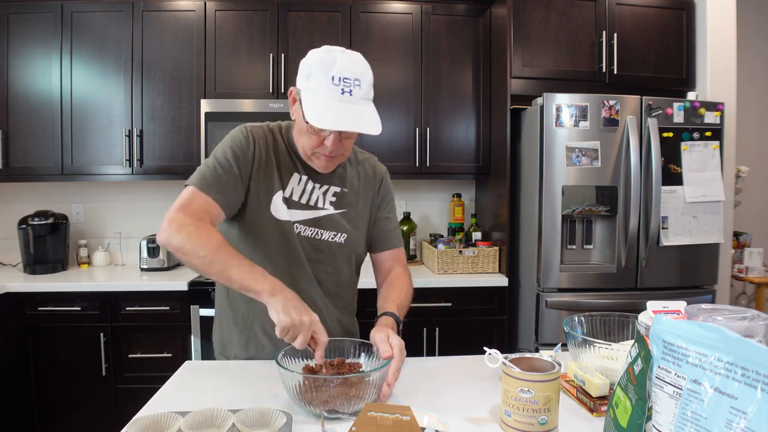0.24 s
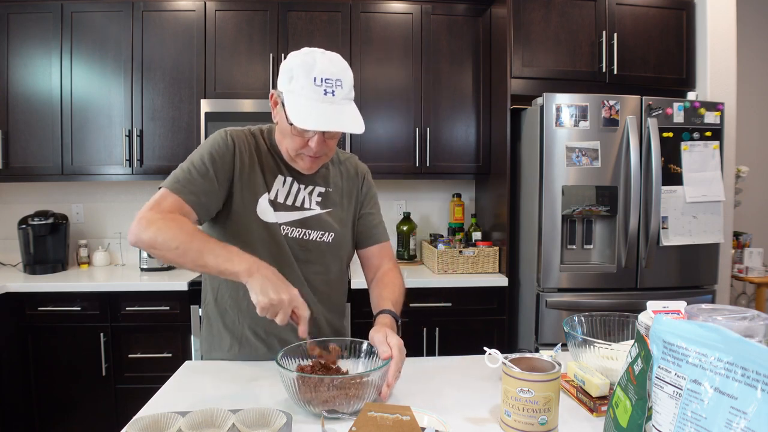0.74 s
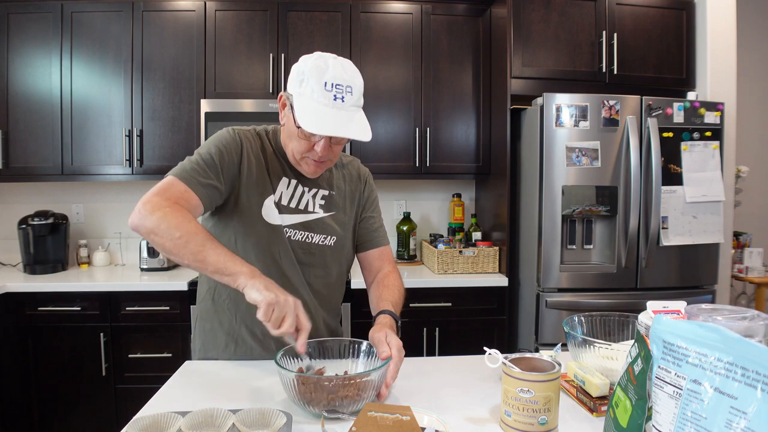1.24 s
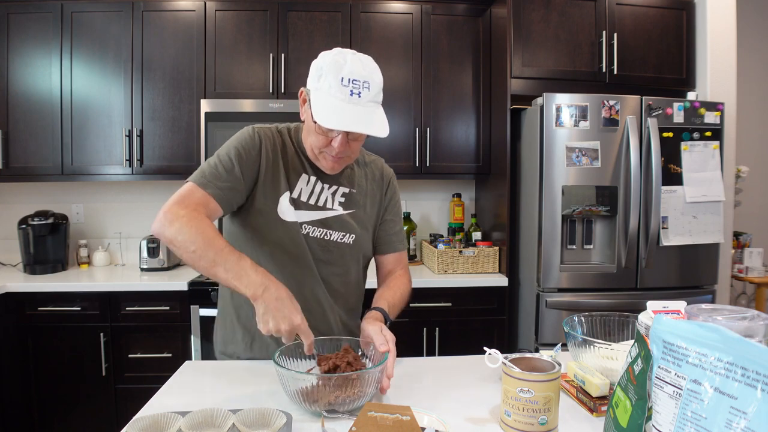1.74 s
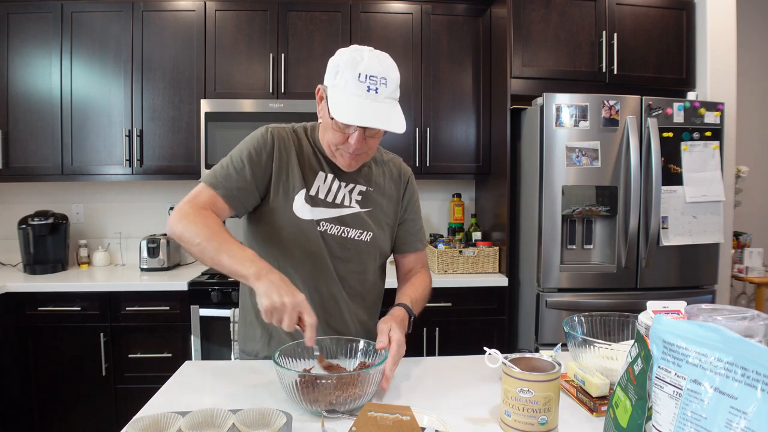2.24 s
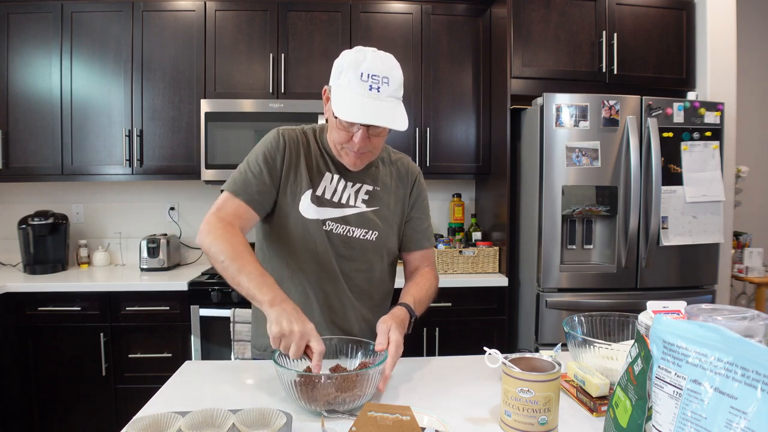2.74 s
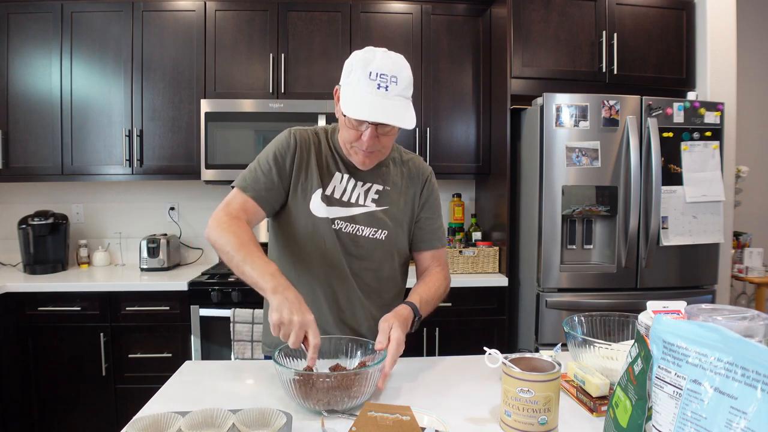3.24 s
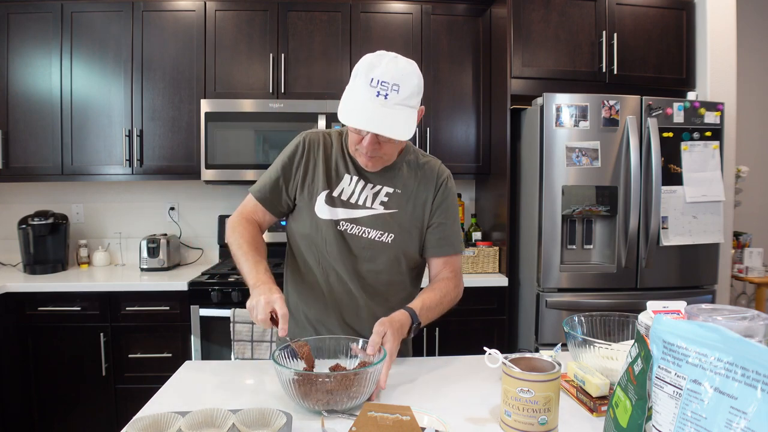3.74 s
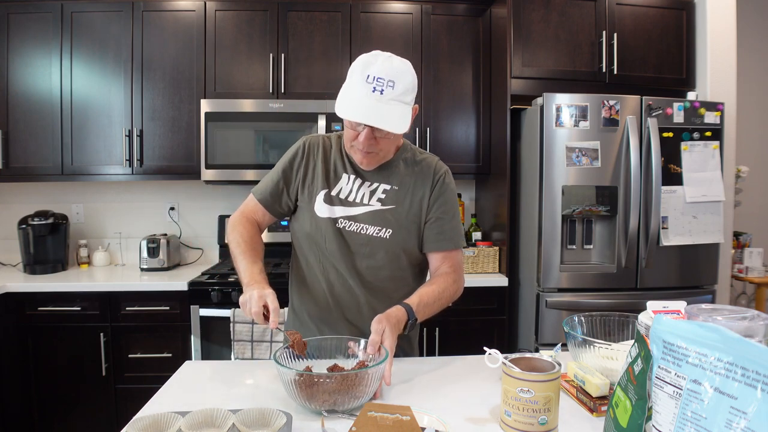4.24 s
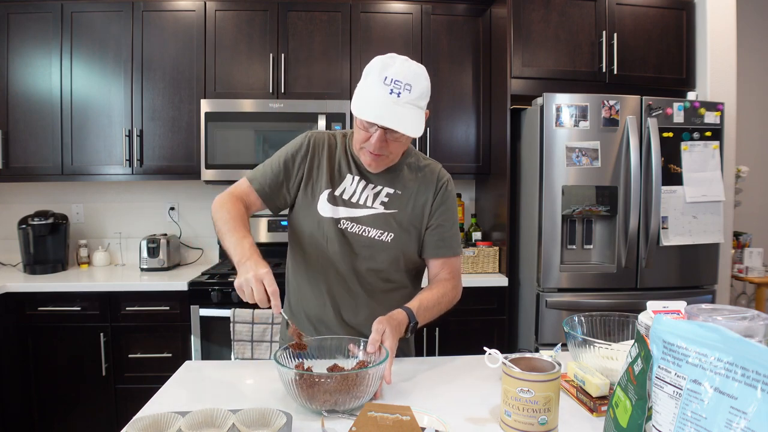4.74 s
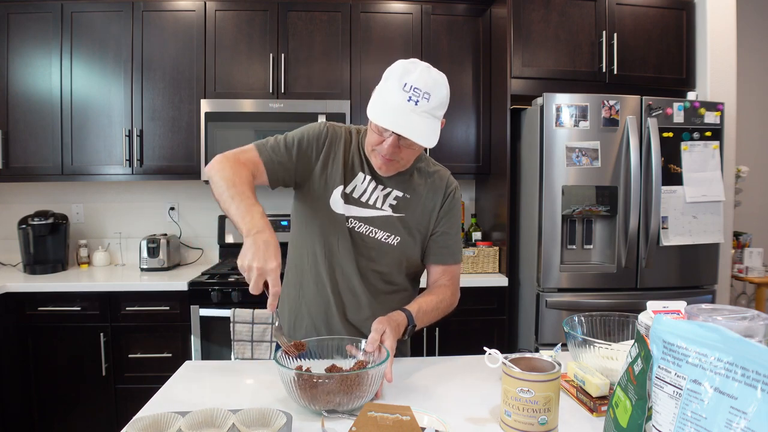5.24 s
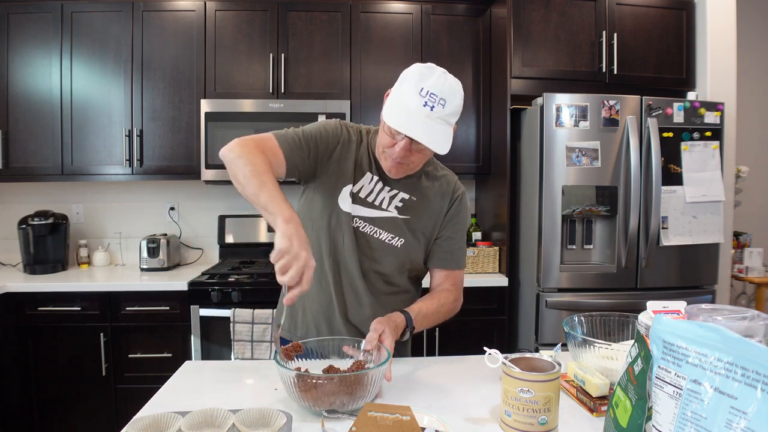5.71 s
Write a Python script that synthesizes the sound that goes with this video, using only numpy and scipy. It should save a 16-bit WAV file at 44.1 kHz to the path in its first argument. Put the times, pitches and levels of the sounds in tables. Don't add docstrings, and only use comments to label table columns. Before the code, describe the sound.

In a home kitchen, a metal spoon stirs thick dough in a glass bowl on a stone counter. Irregular, short, damped knocks come first, with a bright clink near 0.8 seconds, then softer rubbing and squelching. Strong thuds return near 2.8 and 3.7 seconds, the latter with a clink. Quieter scrapes follow until a loud final rim clink. Close, mono microphone, slight room echo, low appliance hum.

```python
import sys
import numpy as np
from scipy import signal
from scipy.fft import rfft, irfft
from scipy.io import wavfile
from scipy.ndimage import uniform_filter1d, minimum_filter1d

SR = 44100
rng = np.random.default_rng(int(sys.argv[2]) if len(sys.argv) > 2 else 0)


def volts_from_db(level):
    exponent = np.asarray(level, float) / 20
    return 10 ** exponent


def transcribe(signal):
    frames = np.atleast_2d(signal).T
    limited = np.clip(frames, -1, 1)
    pcm = np.round(limited * 32767).astype(np.int16)
    wavfile.write(sys.argv[1], SR, pcm)


N = 263277


def rms_one(x):
    return x / np.sqrt(np.mean(x ** 2) + 1e-20)


def at_hz(points, hz):
    point_hz, value = np.transpose(points)
    return np.interp(np.log(hz), np.log(point_hz), value)


def band(x, low_hz, high_hz):
    return signal.sosfilt(signal.butter(2, [low_hz, high_hz], "band", fs=SR, output="sos"), x)


def highpass(x, order, cut_hz):
    return signal.sosfilt(signal.butter(order, cut_hz, "high", fs=SR, output="sos"), x)


def ring(clicks, hz, t60_s):
    radius = volts_from_db(-60 / (t60_s * SR))
    angle = 2 * np.pi * hz / SR
    poles = [1, -2 * radius * np.cos(angle), radius * radius]
    return signal.lfilter([0, np.sin(angle)], poles, clicks + 1e-18)


def clicks_at(times_s, db):
    out = np.zeros(N)
    out[np.round(np.array(times_s) * SR).astype(int)] = volts_from_db(np.array(db))
    return out


def grains(per_s, spread_db):
    sizes = volts_from_db(spread_db * np.minimum(rng.exponential(1, N), 5)) * rng.choice([-1, 1], N)
    return rms_one(sizes * (rng.random(N) < per_s / SR))


def dying_noise(t60_s):
    return rng.standard_normal(4000) * volts_from_db(-60 * np.arange(4000) / SR / t60_s)


def wall_thuds(start_s, peak_db, pitch_hz):
    out = np.zeros(N)
    t = np.arange(2000) / SR
    envelope = volts_from_db(-60 * t / 0.0099) * (1 - np.exp(-t / 0.0011))
    for start, db, hz in zip(start_s, peak_db, pitch_hz):
        pair = np.sin(2 * np.pi * hz * t) - 0.54 * np.sin(2 * np.pi * 0.721 * hz * t)
        i = round(start * SR)
        out[i:i + len(t)] += volts_from_db(db + 2.0) * pair * envelope
    return out


def knocks():
    # start in seconds, wall peak in dB, wall pitch in Hz, bare metal in dB.
    firm_blows = [(0.27, 0, 1194, -28.5), (0.513, -15.5, 884, -46), (0.576, -7.5, 1010, -39.5),
                  (0.581, -5.5, 1270, -40), (0.599, -20.5, 950, -46.5), (0.613, -15, 1080, -54),
                  (0.8163, 1.5, 1460, -32.5), (.8185, -5, 880, -37), (0.831, -2.5, 1160, -44),
                  (1.334, -9, 1410, -63), (1.337, -3.5, 720, -40), (1.34, -5, 680, -35),
                  (1.342, -0.5, 1227, -30), (2.759, -17, 760, -53.5), (2.7595, -24.5, 1570, -54),
                  (2.842, 7, 1287, -23.5), (2.8445, -9, 710, -28), (3.154, -16, 763, -58),
                  (3.154, -19, 1370, -55), (3.7013, 0, 1180, -30), (3.7032, -5.5, 2250, -29),
                  (3.709, 2.5, 782, -35.5), (3.913, -21, 756, -52), (3.922, -18, 1280, -46),
                  (3.944, -31, 840, -50), (5.044, -27.5, 1320, -52), (5.0485, -20.5, 1150, -48)]
    # start in seconds, wall peak in dB, wall pitch in Hz.
    nudges = [(0.066, -36, 1280), (0.18, -36.5, 830), (0.195, -27.5, 1030), (0.54, -34, 728),
              (1.01, -29, 680), (1.33, -61, 900), (1.518, -26, 2040), (1.755, -31.5, 1383),
              (1.82, -55, 956), (2.409, -50, 740), (2.439, -57, 813), (2.591, -59, 1030),
              (3.118, -36, 1140), (3.239, -51.5, 751), (3.309, -27, 763), (3.311, -35, 1700),
              (3.347, -34, 1440), (3.375, -35.5, 1483), (3.402, -30, 1380), (4.015, -40, 970),
              (4.537, -41, 778), (4.931, -41, 768), (5.0494, -21.5, 2060), (5.1502, -28, 2900),
              (5.25, -41, 870), (5.268, -30, 1200)]
    # frequency in Hz, level in dB, t60 in seconds.
    thump_modes = [(180, -12.5, 0.086), (281, -10.5, 0.051), (330.3, -3.5, 0.028), (446, 1.5, 0.012),
                   (593, 2.5, 0.032), (773, 2, 0.015)]
    # frequency in Hz, level in dB, t60 in seconds.
    edge_modes = [(1435, 6.5, 0.0077), (1775, 0, .01), (2324, -13, 0.013), (2680, -4.5, 0.0025)]
    # frequency in Hz, level in dB, t60 in seconds.
    spoon_modes = [(3120, 0, 0.0056), (3660, -6.5, 0.015), (4254, -0.5, 0.028), (5236, -7.5, .005),
                   (6400, -10, .01), (6275, 3.5, 0.004)]
    # frequency in Hz, level in dB, t60 in seconds.
    sheen_modes = [(7960, 5.5, 0.018), (8135, -5.5, 0.06), (8840, 6.5, 0.012), (9630, -1.5, 0.0093),
                   (10970, 4, 0.0061), (13000, -6.5, .012), (13550, 1, 0.0085), (16200, -8.5, 0.012)]

    soft_blows = [(s, db, hz, -64.5 + 0.1 * db) for s, db, hz in nudges]
    start_s, wall_db, wall_hz, metal_db = np.transpose(np.vstack([firm_blows, soft_blows]))
    thump_db = -17 + 0.65 * wall_db - 7 * np.log2(wall_hz / 1000)
    edge_db = 0.5 * (wall_db + metal_db) - 1.5
    bodies = ((thump_modes, thump_db), (edge_modes, edge_db),
              (spoon_modes, metal_db + 0.5), (sheen_modes, metal_db - 10.5))

    out = wall_thuds(start_s, wall_db, wall_hz)
    for modes, blow_db in bodies:
        luck_db = rng.normal(0, 2.5, (len(start_s), len(modes)))
        for k, (hz, mode_db, t60_s) in enumerate(modes):
            late_s = 0.0006 * rng.random(len(start_s))
            clicks = clicks_at(start_s + late_s, blow_db + mode_db + luck_db[:, k])
            out += (-1) ** k * ring(clicks, hz, t60_s)
    return out


def strokes():
    # middle in seconds, length in seconds, hiss in dB, bare glass ring in dB.
    rubs = [(1.225, 0.27, -53, -76), (1.297, .22, -45, -63), (1.512, 0.11, -66, -66),
            (1.65, 0.39, -50, -76), (2.1, .2, -53.5, -76), (2.49, 0.16, -52, -75.5), (3.203, .13, -49, -77),
            (3.607, 0.11, -56, -74.5), (4.12, 0.25, -49, -67), (4.307, 0.09, -45.5, -57.5),
            (4.49, .22, -56, -81), (5.13, .12, -66, -61), (5.304, 0.15, -66, -57.5),
            (5.409, 0.078, -40, -58)]
    t = np.arange(N) / SR
    hiss_gain, ring_gain = np.zeros(N), np.zeros(N)
    for middle_s, length_s, hiss_db, ring_db in rubs:
        swell_db = -8.5 * np.abs(2 * (t - middle_s) / length_s) ** 1.9
        hiss_gain += volts_from_db(hiss_db + swell_db)
        ring_gain += volts_from_db(ring_db + swell_db)
    return hiss_gain, ring_gain


def glass():
    # start in seconds, ring in dB, crack in dB, chatter in dB.
    far_wall = [
        (.8166, -3.5, -3.5, 2.5),
    ]
    near_rim = [
        (3.7017, -5, -3.6, -20),
    ]
    top_rim = [
        (5.1511, -33, -35, -36),
        (5.7671, -9, -3, -12.5),
    ]
    # start in seconds, ring, crack, chatter in dB.
    touches = [(1.093, -53, -44, -72), (1.331, -76, -44, -65), (1.331, -70, -35, -60),
               (1.509, -50, -52, -42), (1.522, -71, -54, -46), (1.56, -52, -52, -60),
               (2.409, -68, -42.5, -51), (3.824, -37, -40, -60), (3.842, -37, -24, -60),
               (3.905, -45, -44, -60), (4.064, -69, -45, -58), (4.32, -44, -58, -42), (4.51, -68, -48, -67),
               (4.5542, -76, -49, -44.5), (4.565, -71, -50, -64), (5.035, -69, -49, -50),
               (5.049, -45.5, -53, -58), (5.117, -59, -45, -60), (5.126, -52, -45, -58),
               (5.265, -56, -44, -63), (5.29, -42, -37, -46), (5.319, -43, -37, -59), (5.46, -50, -48, -66)]
    # frequency in Hz, t60 in seconds.
    bowl_modes = [(490, .036), (1188, .07), (1335, .04), (2086, .049), (2134, .04), (14900, .024),
                  (3207, .05), (3270, .06), (4422, .056), (4565, .047), (4612, .06), (5036, .023),
                  (5526, .018), (6200, .055), (7484, .031), (7737, .019), (7971, .045), (8185, .051),
                  (8409, .055), (8777, .024), (9324, .04), (9880, .055), (10180, .03), (11190, .06),
                  (11827, .03), (12138, .06), (12862, .045), (13286, .05), (13570, .05), (14517, .055)]
    # far wall, near rim, top rim, rubbed or touched, all in dB.
    mode_strengths = [(-22, -25, -12.5, -7), (-11.5, -6.5, -23, -4), (-20, -17.5, -19.5, -7),
                      (2, -4, -18, -3), (4.5, -1, -26, -2), (-14, -31, -30, -10.5), (-6, -17, -15, -7),
                      (-8, -2, -19, -8), (-22, -22, -22, -21), (-25, -18, -11, -11), (-24, -16, -15, -13),
                      (-30, -15, -18, -17), (-6, -11, -28, -12.5), (-17.5, 1, -10, -14),
                      (-17.5, -10, -22, -15), (-18.5, -22, -9, -3), (-10.5, -1, -3, -6), (-26, -14, -3, -8),
                      (-27, -6, -20, -7), (-17.5, -5, -6, -9), (-26, -18, -19, -18), (-12, -14, 0, -9),
                      (-18, -19.5, -5, -16), (-26, -11, -23, -15), (-26.5, -30, -20, -22),
                      (-16, -28, -17, -12), (-32, -27, -15, -12), (-36, -29, -26, -13),
                      (-28.5, -36, -24, -12), (-30, -18, -34, -19)]

    places = [np.transpose(p) for p in (far_wall, near_rim, top_rim, touches)]
    strikes = [clicks_at(p[0], p[1]) for p in places]
    crack = sum(clicks_at(p[0], p[2]) for p in places)
    chatter = sum(clicks_at(p[0], p[3]) for p in places)

    grit = grains(3500, spread_db=2.5)
    hiss_gain, ring_gain = strokes()
    hiss, rub = grit * hiss_gain, grit * ring_gain
    out = band(hiss, 3600, 14000) * volts_from_db(-13.5) + band(hiss, 7400, 9300) * volts_from_db(-22.5)

    late = rng.integers(0, 40, len(mode_strengths))
    for k, ((hz, t60_s), place_db) in enumerate(zip(bowl_modes, mode_strengths)):
        struck = sum(volts_from_db(db) * hit for db, hit in zip(place_db, strikes))
        drive = np.roll(struck, late[k]) + volts_from_db(place_db[3] - 18.5) * rub
        out += (-1) ** k * ring(drive, hz, t60_s)

    crack_noise = signal.fftconvolve(crack, dying_noise(0.005))[:N]
    chatter_noise = signal.fftconvolve(chatter, dying_noise(0.04))[:N]
    out += band(crack_noise, 4400, 13500)
    return out + band(band(chatter_noise, 4300, 12000), 4300, 9500)


def dough():
    # time in seconds, level in dB.
    squelch = [(0.0, -50), (0.27, -47), (0.35, -85), (0.5, -42), (0.63, -47), (0.78, -43), (1.31, -48.5),
               (1.46, -43.5), (2.68, -54), (2.96, -52), (3.56, -44), (3.76, -63), (3.87, -40.5),
               (4.04, -44), (4.57, -56), (5.22, -42.5), (5.64, -54), (5.97, -48)]
    time_s, db = np.transpose(squelch)
    level_db = np.interp(np.arange(N) / SR, time_s, db, left=-60, right=-60)
    pops = grains(1200, spread_db=2.2)
    dealt = rng.integers(0, 12, N)
    pitches_hz = np.geomspace(280, 1500, 12)
    rings = sum(ring(pops * (dealt == k), hz, 1.0 / hz) for k, hz in enumerate(pitches_hz))
    return volts_from_db(level_db - 7.5) * rms_one(rings)


def hum():
    # frequency in Hz, level in dB per Hz.
    room_tone = [(20, 9.5), (50, -7.5), (85, 1), (120, 5.5), (160, -1.5), (220, -2.5), (420, 0.5),
                 (800, -7), (1500, -11.5), (2500, -26.5), (5000, -27.5), (8000, -32), (12000, -34),
                 (16000, -36.5)]
    hz = np.fft.rfftfreq(N, 1 / SR)
    spectrum = rfft(rng.standard_normal(N)) * volts_from_db(at_hz(room_tone, hz + 1))
    return volts_from_db(-48.5) * rms_one(irfft(spectrum, N))


def kitchen(x):
    # frequency in Hz, t60 in seconds.
    room_t60 = [(150, 0.31), (500, 0.55), (1200, 0.4), (3000, 0.47), (8000, 0.38), (15000, .2)]
    # delay in seconds, level in dB.
    echoes = [(.0045, -13), (0.014, -13), (0.019, -15.5), (.028, -19.5), (.047, -25.5)]
    t = np.arange(SR) / SR
    edges_hz = 70 * 2 ** np.arange(0, 8.1, 0.5)
    white = rng.standard_normal((2, SR))
    tail = np.zeros(SR)
    for k, (low, high) in enumerate(zip(edges_hz, edges_hz[1:])):
        t60_s = at_hz(room_t60, np.sqrt(low * high))
        tail += band(white[k % 2], low, high) * volts_from_db(-60 * t / t60_s)
    response = volts_from_db(-33.5) * tail * (1 - np.exp(-t / 0.006))
    for delay_s, db in echoes:
        response[round(delay_s * SR)] += volts_from_db(db)
    return x + signal.fftconvolve(x, response)[:N]


def scene():
    bowl = highpass(knocks() + glass(), 3, 140)
    return (kitchen(bowl) + dough() + hum())[None]


def treble_dropout(x):
    dull = signal.sosfilt(signal.butter(6, 2300, fs=SR, output="sos"), x)
    treble = highpass(x, 4, 4000)
    level = np.sqrt(uniform_filter1d(treble ** 2, size=64, origin=31) + 1e-12)
    ahead = -minimum_filter1d(-level, size=760, origin=-380)
    starved = uniform_filter1d(1. * ((ahead > 0.04) & (level < 0.004)), size=40)
    starved = np.minimum(starved, np.roll(starved, -130, axis=-1))
    return x + starved * (dull - x)


def limiter(x, ceiling_db, release_db_s):
    climb_db = release_db_s * np.arange(N) / SR
    over_db = np.maximum(20 * np.log10(np.abs(x) + 1e-9) - ceiling_db, 0)
    held_db = np.maximum.accumulate(over_db + climb_db, axis=-1) - climb_db
    duck_db = -minimum_filter1d(-held_db, size=45)
    return x * volts_from_db(-uniform_filter1d(duck_db, size=44))


def roll_off(x):
    return signal.sosfilt(signal.butter(12, 17010, fs=SR, output="sos"), x)


def record(dry):
    x = highpass(dry, 1, 70)
    x = signal.sosfilt(signal.cheby2(22, 45, 15850, fs=SR, output="sos"), x)
    mix = limiter(treble_dropout(x), ceiling_db=-1.3, release_db_s=150)
    return roll_off(mix)


dry = scene()
out = record(dry)
transcribe(out)
```